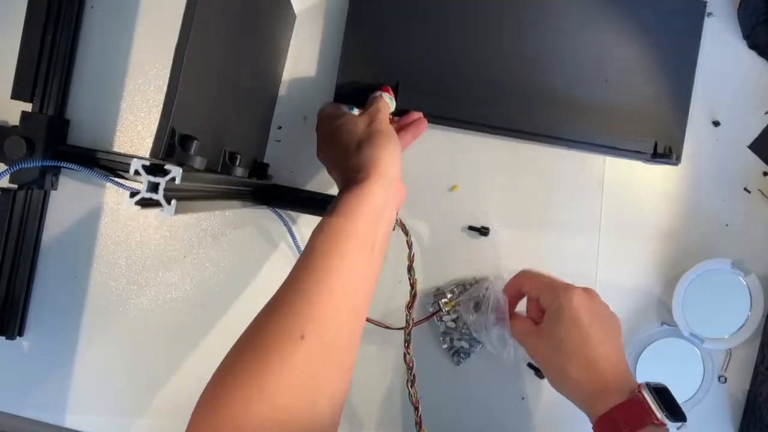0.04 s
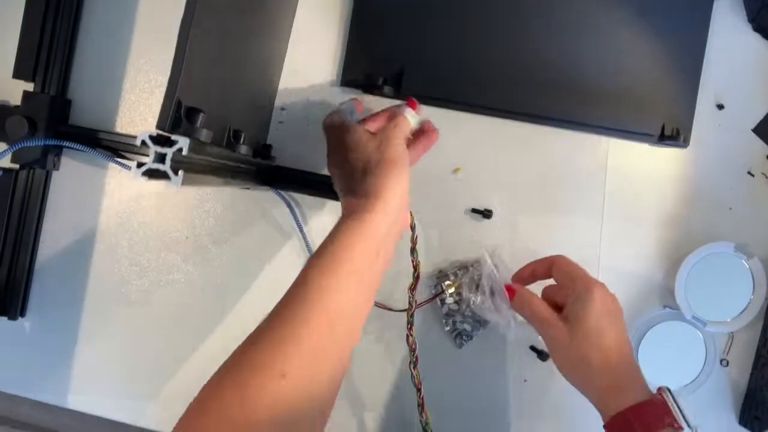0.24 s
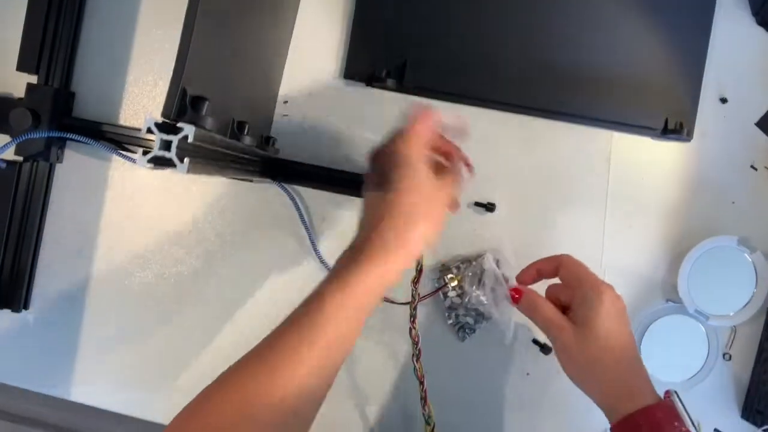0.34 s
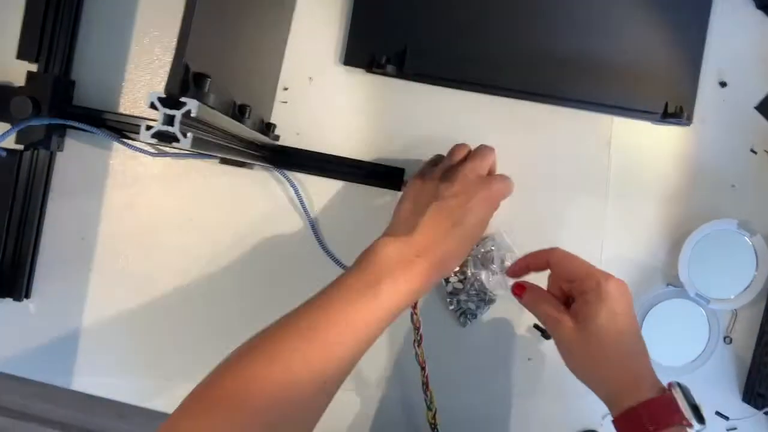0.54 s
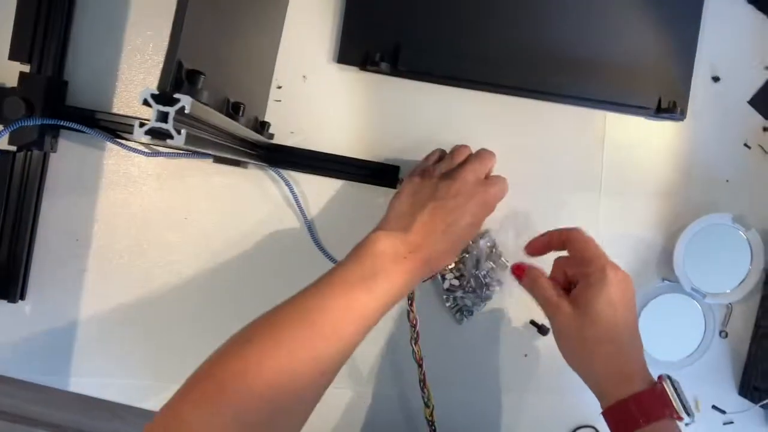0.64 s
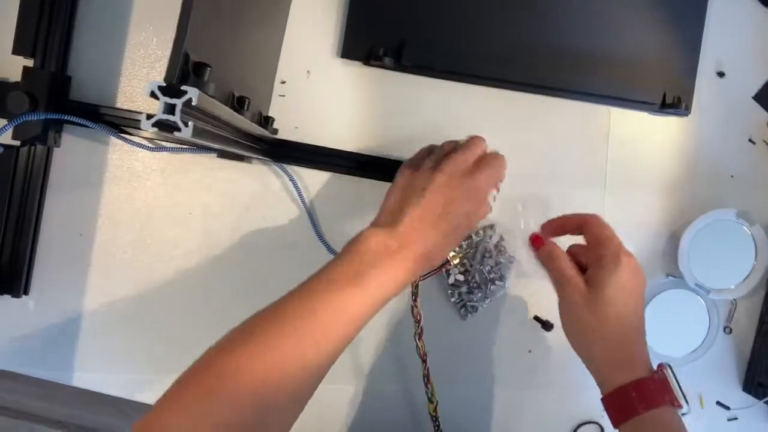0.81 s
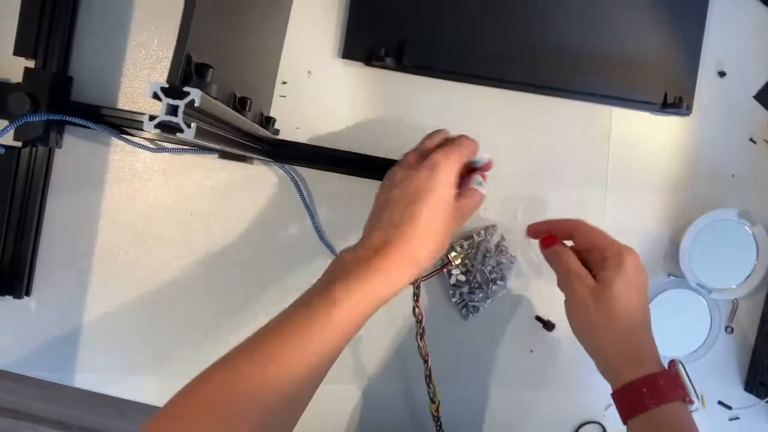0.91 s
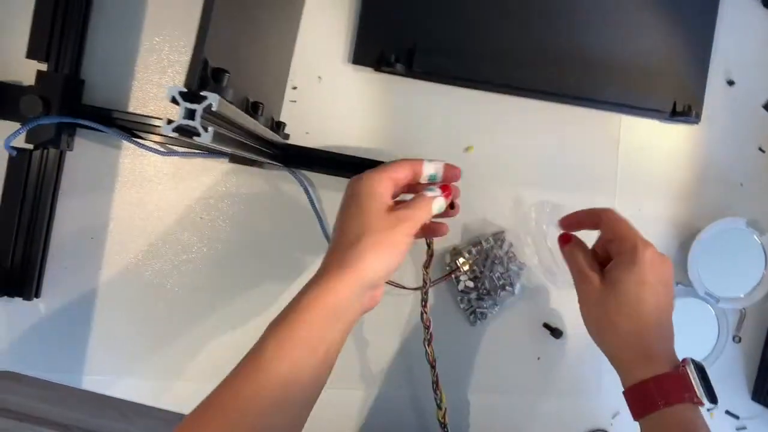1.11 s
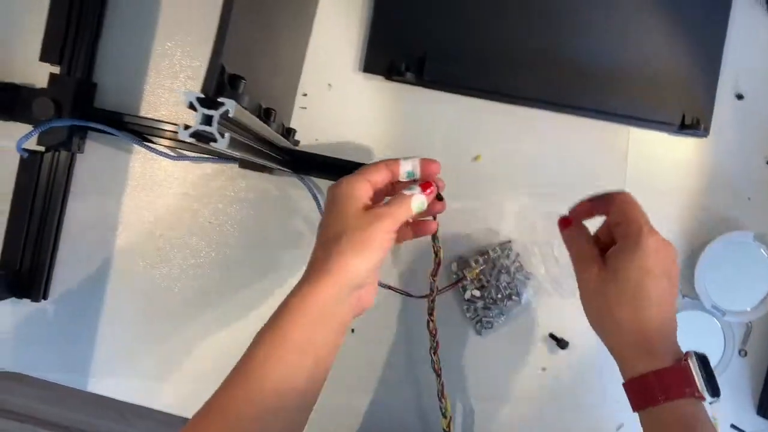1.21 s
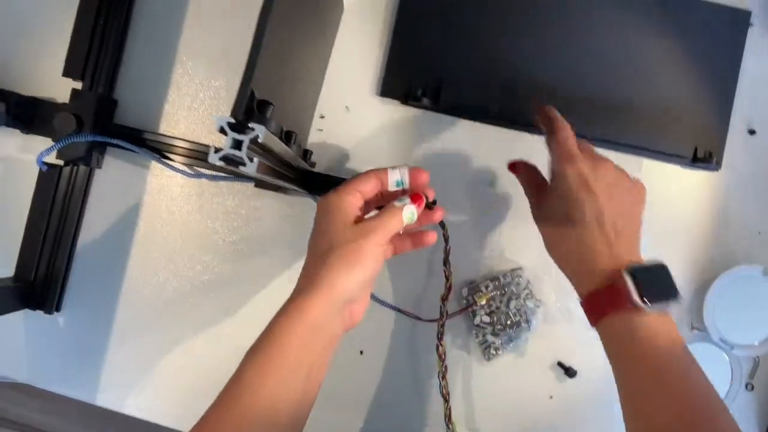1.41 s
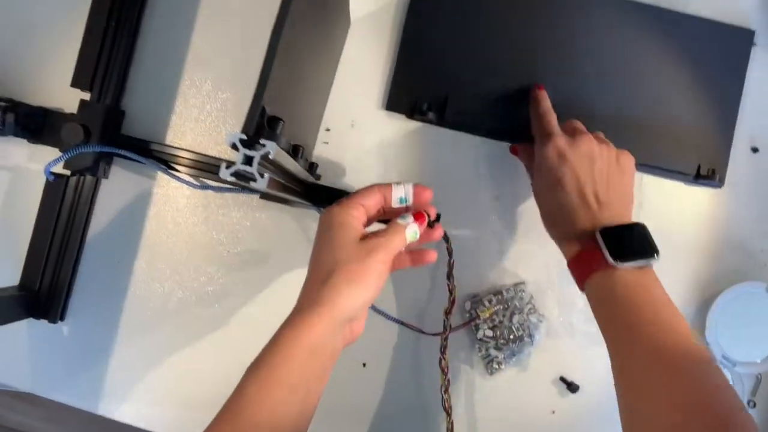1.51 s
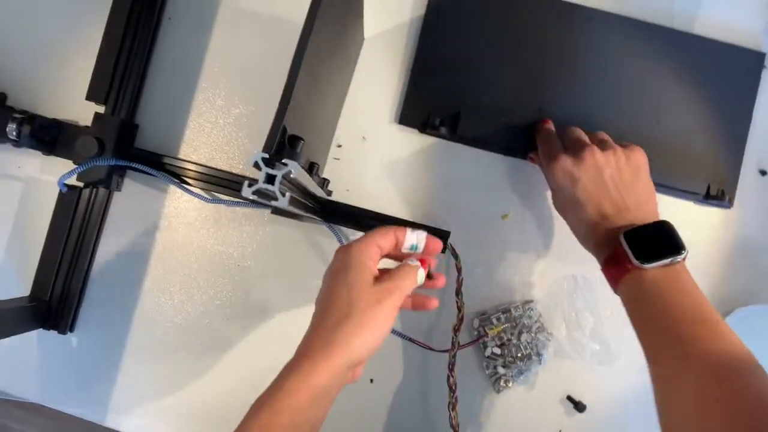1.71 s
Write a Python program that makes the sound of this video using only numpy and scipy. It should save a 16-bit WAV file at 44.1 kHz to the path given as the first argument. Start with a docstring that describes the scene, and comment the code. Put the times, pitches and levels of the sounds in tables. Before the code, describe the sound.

Small metal nuts and screws clack in a crinkling plastic bag, with one hard bench knock

```python
"""On a workbench in a quiet room, fingers rummage in a plastic bag of small screws and nuts.
Knocks ring the bench top as a bank of decaying modes, and the hardest one sets the frame humming.
Nuts clack as short hollow rings with grit; the film snaps, crinkles and rustles as shaped noise.
Low thuds and room tone lie underneath, all heard close up by a phone with two microphones."""
import sys
import numpy as np
from scipy import signal
from scipy.fft import rfft, irfft, next_fast_len
from scipy.io import wavfile

SR = 44100
rng = np.random.default_rng(int(sys.argv[2]) if len(sys.argv) > 2 else 0)


def gain_from_db(level_db):
    """Turn a decibel level (scalar or array-like) into a linear amplitude factor."""
    decades = np.asarray(level_db, float) / 20
    return 10 ** decades


def persist_wave(psi):
    """Save psi, clipped to +-1, as 16-bit WAV."""
    counts = np.round(np.clip(psi, -1, 1) * 32767).astype(np.int16)
    wavfile.write(sys.argv[1], SR, np.atleast_2d(counts).T)


N = 77175

# knocks on the bench, the first begun just before the start: t/s, strength/dB, contact cut-off f/Hz
KNOCKS = [(-.012, -38, 3000), (0.158, -37.5, 1720), (0.2124, -19.5, 1783), (0.664, -56, 500),
          (1.591, -42, 1230)]
# modes of the bench top: f/Hz, level/dB, t60/s before the hands damp it
BENCH_MODES = [(171, -4, 0.26), (214.1, 3.5, 0.2), (250.6, 2.5, 0.07), (317, 3.5, 0.21),
               (432.3, -4.5, 0.14), (522.3, -12.5, 0.3), (622, -8, 0.28), (667, -9.5, 0.18),
               (898, -13, 0.1018), (1136, -6, 0.064), (1555, 4.5, 0.019)]
# clacks of nuts: t/s, level/dB, pitch f/Hz
CLACKS = [(.005, -30, 1250), (0.1608, -33.5, 1850), (0.163, -48, 2920), (0.2142, -28.5, 1161),
          (.228, -30, 1640), (0.2756, -31, 1570), (0.4102, -45.5, 1110), (0.4591, -36, 1330),
          (0.5466, -40.5, 1280), (.6689, -49.5, 5820), (0.6829, -43, 1530), (0.7464, -42.5, 1510),
          (0.754, -44, 1240), (0.7705, -55, 5370), (0.8256, -39.5, 1220), (0.8612, -44, 1590),
          (0.878, -47, 1260), (0.9351, -34.5, 1194), (0.9784, -40.5, 1300), (0.9997, -42.5, 1233),
          (1.1167, -44, 1290), (1.121, -47.5, 1310), (1.5778, -42.5, 1740), (1.596, -32.5, 1700),
          (1.6222, -40.5, 1700), (1.6441, -42, 1830), (1.683, -43, 4140), (1.7404, -44, 1250)]
# snaps of the film: t/s, level/dB, treble against mids/dB
SNAPS = [(0.1476, -40.5, 4), (0.2135, -35.5, -6), (.2255, -37.5, -4), (0.2294, -30, -5), (0.2759, -25.5, 2),
         (0.4132, -48.5, -4), (0.4581, -35, -12), (0.818, -44.5, -12), (0.86, -39.5, -8),
         (0.9341, -33, 4.5), (1.0084, -46, -7), (1.104, -46.5, -2), (1.109, -45, -1), (1.116, -55.5, 4),
         (1.5751, -46, 15), (1.5813, -43, 19.5), (1.5941, -31, 9), (1.5964, -33, 6.5), (1.6068, -37, 0),
         (1.6223, -42.5, 23.5), (1.644, -42, 16), (1.683, -39.5, 12), (1.721, -53, 18), (1.7404, -42, -7)]
# colour of snaps and crinkles: f/Hz, relative level/dB
SNAP_COLOUR = [(1200, -26.5), (2500, -8.5), (5000, -4.5), (7500, 2), (10000, -2.5), (13000, -1),
               (16000, -16), (18000, -90.5)]
# how busy the fingers are, before each layer's trim: t/s, film level/dB, heap level/dB
RUMMAGE = [(0, -36.5, -41.5), (.035, -45.5, -39), (.086, -55, -50), (.17, -60.5, -55.5), (.23, -56, -36),
           (.3, -56, -47), (.36, -59.5, -52.5), (.57, -68.5, -61.5), (.72, -66.5, -58), (.8, -76, -63.5),
           (.83, -50.5, -59), (.855, -65.5, -60), (.95, -62.5, -59.5), (1.02, -65, -61),
           (1.097, -83, -65.5), (1.104, -56, -58), (1.119, -52.5, -58), (1.127, -65, -61),
           (1.185, -61.5, -62), (1.2, -88.5, -64.5), (1.4, -99, -96), (1.555, -99, -87.5),
           (1.58, -56.5, -49), (1.63, -54, -48.5), (1.68, -53, -58.5), (1.715, -64, -67.5),
           (1.75, -65, -68)]
# colour of the rustling film: f/Hz, relative level/dB
RUSTLE_COLOUR = [(1200, -52.5), (2500, 0.5), (5000, 1), (7500, -8.5), (10000, -15), (13000, -12.5),
                 (16000, -27.5), (17500, -59.5)]
# colour of the shuffling heap: f/Hz, relative level/dB
SHUFFLE_COLOUR = [(90, -29.5), (160, 0.5), (300, -1.5), (600, -1), (1200, -16.5), (2000, -17), (3500, -18),
                  (6000, -75)]
# low thuds through the stand: t/s, level/dB
RUMBLE = [(0, -39.5), (.09, -71), (.19, -61), (.24, -39.5), (.45, -56.5), (.56, -71), (.67, -64.5),
          (1.2, -88.5), (1.29, -59.5), (1.48, -73), (1.6, -55.5)]
# colour of the room tone: f/Hz, relative level/dB
AIR_COLOUR = [(15, -47.5), (25, -6), (110, -8), (500, -15.5), (1100, -29), (3000, -39), (10000, -42),
              (13000, -51), (14000, -92)]
# decay of the room: f/Hz, t60/s
ROOM_DECAY = [(200, 0.69), (1000, 0.22), (4000, 0.26), (12000, 0.089)]
# left-right likeness of diffuse sound: f/Hz, likeness/0-1
ALIKE = [(300, 0.72), (1400, 0.4), (4000, 0.5), (8000, 1)]
# phase of left behind right: f/Hz, lag/rad
LAG = [(0, 0), (1300, 0), (2600, -1.2), (4100, -.5), (7200, -3.14), (10500, 0), (18000, 7.4)]
# scrambling of that lag by the phone body: f/Hz, spread/rad
SCATTER = [(1200, 0.19), (2200, 2.11), (6000, 1.8), (7600, 0.022)]
# lean of the picture: f/Hz, left minus right/dB
LEAN = [(60, -0.5), (180, -1), (550, 2), (1650, 3.5), (4970, 0)]


def evened(x):
    """Scales a sound to rms 1."""
    return x / np.sqrt(np.mean(x ** 2) + 1e-20)


def read(points, hz):
    """Reads a table on a log-frequency axis."""
    f, value = np.transpose(points)
    return np.interp(np.log(hz + 1), np.log(f + 1), value)


def along(curve, column):
    """Turns a dB column into a gain at every sample."""
    rows = np.array(curve)
    return gain_from_db(np.interp(np.arange(N) / SR, rows[:, 0], rows[:, column]))


def add(mix, s, sound):
    """Drops a sound into the mix at s seconds, trimming what falls outside."""
    at = round(s * SR)
    sound = sound[max(-at, 0):]
    part = mix[max(at, 0):][:len(sound)]
    part += sound[:len(part)]


def coloured(x, spectrum):
    """Filters a sound by a table of f/Hz, level/dB."""
    gain = gain_from_db(read(spectrum, np.fft.rfftfreq(x.shape[-1], 1 / SR)))
    return irfft(rfft(x) * gain, x.shape[-1])


def spread(spectrum):
    """Makes two partly alike channels of coloured noise."""
    a, b = rfft(rng.standard_normal((2, N)))
    same = np.clip(read(ALIKE, np.fft.rfftfreq(N, 1 / SR)), 0, 1)
    right = same * a + np.sqrt(1 - same ** 2) * b
    return evened(coloured(irfft([a, right], N), spectrum))


def bench():
    """Each knock rings all modes of the top, softer contact losing the high ones; the frame hums after."""
    travel_s = 0.0021  # bending waves at 250 Hz arrive this late; higher ones run faster
    rise_cycles = 0.4  # build-up time constant of each mode
    damp_db_per_s2 = 330  # the resting hands choke the ring more and more
    frame_hz, frame_db, frame_rise_s, frame_t60_s = 126.9, -20.5, 0.031, 0.36
    out, t = np.zeros(N), np.arange(SR // 2) / SR
    hz, db, t60 = np.transpose(BENCH_MODES)[:, :, None]
    since = np.maximum(t - travel_s * np.sqrt(250 / hz), 0)
    decay = gain_from_db(db - 60 * since / t60 - damp_db_per_s2 * since ** 2)
    rise = 1 - np.exp(-since * hz / rise_cycles)
    ring = decay * np.sin(2 * np.pi * hz * since) * rise
    # neighbouring modes swing opposite ways far from the blow
    ring *= (-1.) ** np.arange(len(BENCH_MODES))[:, None]
    for s, level_db, top_hz in KNOCKS:
        softened = ring / (1 + (hz / top_hz) ** 2)
        add(out, s, gain_from_db(level_db) * softened.sum(0))
    hum = gain_from_db(frame_db - 60 * t / frame_t60_s) * np.sin(2 * np.pi * frame_hz * t)
    hum *= (1 - np.exp(-t / frame_rise_s)) ** 2
    hardest = max(KNOCKS, key=lambda row: row[1])
    add(out, hardest[0], hum)
    return out


def clacks():
    """A clack is a short hollow ring of two partials with a gritty puff around its pitch."""
    t60_s, overtone, overtone_db = 0.022, 1.28, -12.5
    out, t = np.zeros(N), np.arange(2048) / SR
    for s, db, hz in CLACKS:
        noise = rng.standard_normal(2048)
        grit = evened(coloured(noise, [(hz * .5, -30), (hz * .8, 0), (hz * 2, -4), (hz * 4, -30)]))
        ring = np.sin(2 * np.pi * hz * t)
        ring += gain_from_db(overtone_db) * np.sin(2 * np.pi * hz * overtone * t)
        attack = np.minimum(t / 0.0005, 1)
        add(out, s, gain_from_db(db - 60 * t / t60_s) * (ring + 0.6 * grit) * attack)
    return out


def rattle():
    """Small nuts jostle: random faint hits, each ringing at one of eight pitches, follow the heap."""
    hits_per_s, centre_hz, t60_s, level_db = 500, 1250, 0.01, -6.5
    t = np.arange(2048) / SR
    size = gain_from_db(5.0 * np.minimum(rng.exponential(1, N), 2))
    hits = size * (rng.random(N) < hits_per_s / SR)
    kind, out = rng.integers(0, 8, N), np.zeros(N)
    for k, step in enumerate(rng.uniform(-0.22, 0.51, 8)):
        ring = gain_from_db(-60 * t / t60_s) * np.sin(2 * np.pi * centre_hz * (1 + step) * t)
        out += signal.oaconvolve(hits * (kind == k), ring)[:N]
    return gain_from_db(level_db) * along(RUMMAGE, 2) * evened(out)


def snaps():
    """The film buckles in short bursts of noise, each with its own treble tilt."""
    t60_s = 0.015
    out, t = np.zeros(N), np.arange(2048) / SR
    for s, db, tilt_db in SNAPS:
        noise = coloured(rng.standard_normal(2048), SNAP_COLOUR)
        burst = evened(coloured(noise, [(4000, 0.0047), (9000, tilt_db)]))
        attack = np.minimum(t / 0.0002, 1)
        add(out, s, gain_from_db(db - 60 * t / t60_s) * burst * attack)
    return out


def crinkles():
    """Tiny random creases of the film, each a decaying puff of noise, follow the rummaging."""
    per_s, size_spread_db, decay_s, level_db = 360, 1, 0.011, -4
    size = gain_from_db(size_spread_db * np.minimum(rng.exponential(1, N), 4))
    creases = size * (rng.random(N) < per_s / SR)
    envelope = signal.lfilter([1], [1, -np.exp(-1 / (decay_s * SR))], creases)
    bursts = envelope * rng.standard_normal(N)
    return gain_from_db(level_db) * along(RUMMAGE, 1) * evened(coloured(bursts, SNAP_COLOUR))


def rustle():
    """Film sliding on itself: wide noise swelling with the fingers."""
    return gain_from_db(-6.0) * along(RUMMAGE, 1) * spread(RUSTLE_COLOUR)


def shuffle():
    """The heap shifting: darker wide noise swelling with the fingers."""
    return along(RUMMAGE, 2) * spread(SHUFFLE_COLOUR)


def room(x):
    """Reflections as a two-channel noise tail that dies at its own rate in each band."""
    level_db = -10.5
    noise = spread([(20, 0.023), (20000, 0.0047)])[:, :SR // 2]
    hz, t, z = signal.stft(noise, SR, nperseg=128)
    decay = gain_from_db(-60 * t / read(ROOM_DECAY, hz)[:, None])
    tail = signal.istft(z * decay, SR, nperseg=128)[1]
    tail = np.pad(tail / np.linalg.norm(tail[0]), ((0, 0), (130, 0)))  # pre-delay in samples
    return gain_from_db(level_db) * signal.fftconvolve(x[None], tail, axes=1)[:, :N]


def rumble():
    """Low thuds through the stand: deep noise under a level curve."""
    colour = [(15, 7.5), (28, -12.5), (75, 5.0), (105, -45.5)]
    return along(RUMBLE, 1) * evened(coloured(rng.standard_normal(N), colour))


def air():
    """Room tone: steady, wide, dark noise."""
    return gain_from_db(-67) * spread(AIR_COLOUR)


def scene():
    """Layers the near sounds and their room over rustle, shuffle, rumble and room tone."""
    top = bench()
    near = clacks() + rattle() + snaps() + crinkles()
    room_send = near + gain_from_db(-8) * top  # the bench reaches the phone mostly through the stand
    return top + near + room(room_send) + rustle() + shuffle() + rumble() + air()


def top_cut(x):
    """Nothing passes above the cut-off."""
    return signal.sosfilt(signal.butter(12, 17050, fs=SR, output="sos"), x)


def record(dry):
    """The two microphones hear the same mix with a lag and a lean that depend on frequency."""
    size = next_fast_len(N + 4096)
    hz = np.fft.rfftfreq(size, 1 / SR)
    anchors = np.arange(0, SR / 2, 220)
    ripple = np.interp(hz, anchors, rng.standard_normal(len(anchors)))
    lag = np.interp(hz, *np.transpose(LAG)) + read(SCATTER, hz) * ripple
    left = gain_from_db(read(LEAN, hz) / 2) * np.exp(-.5j * lag)  # half the offset; the right takes the inverse
    mix = irfft(rfft(dry, size) * [left, 1 / left], size)[:, :N]
    return top_cut(mix)


dry = scene()
out = record(dry)
persist_wave(out)
```